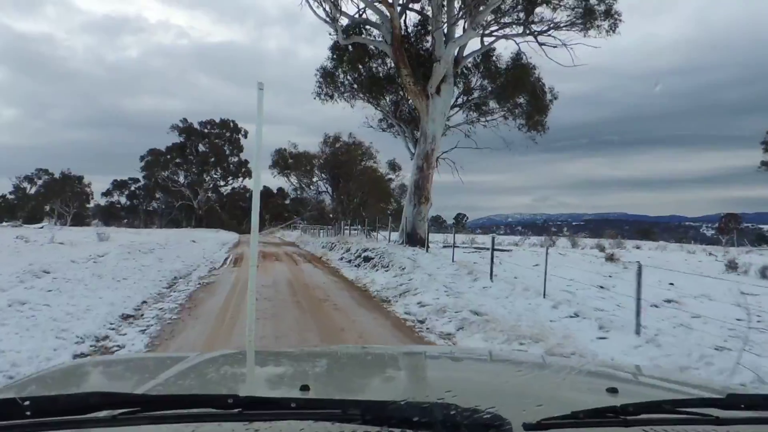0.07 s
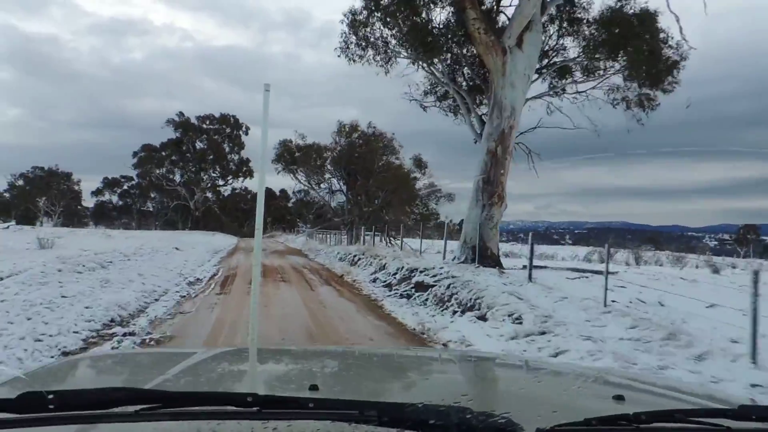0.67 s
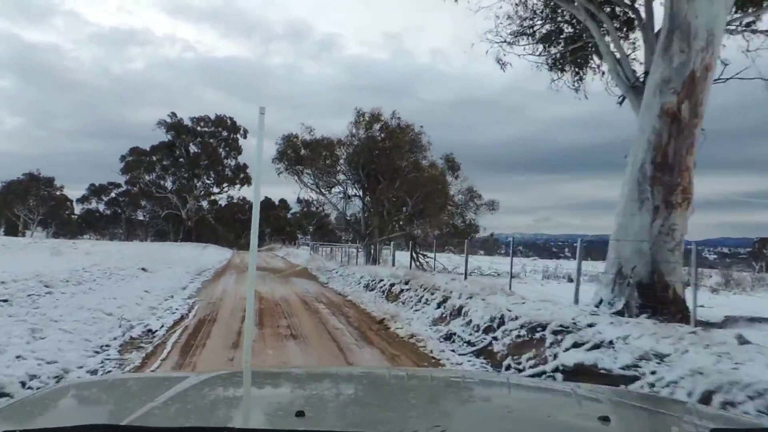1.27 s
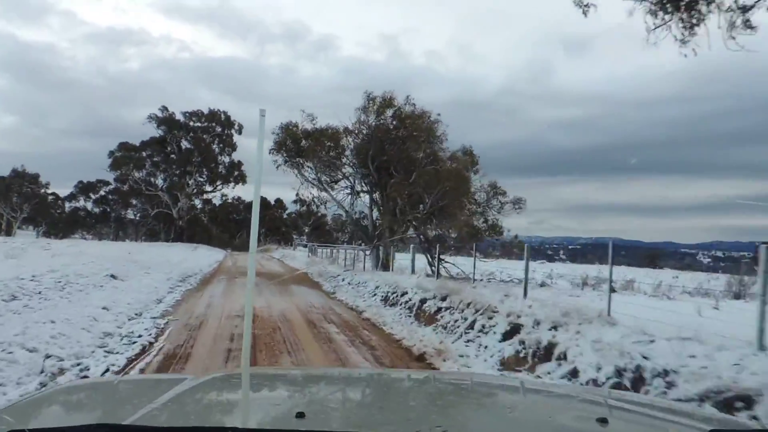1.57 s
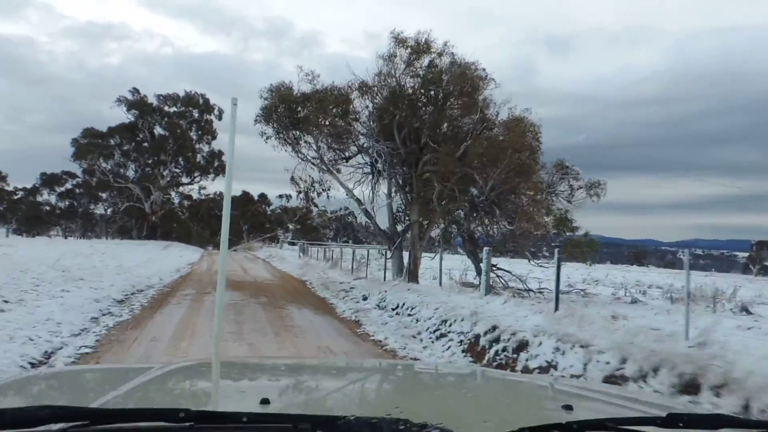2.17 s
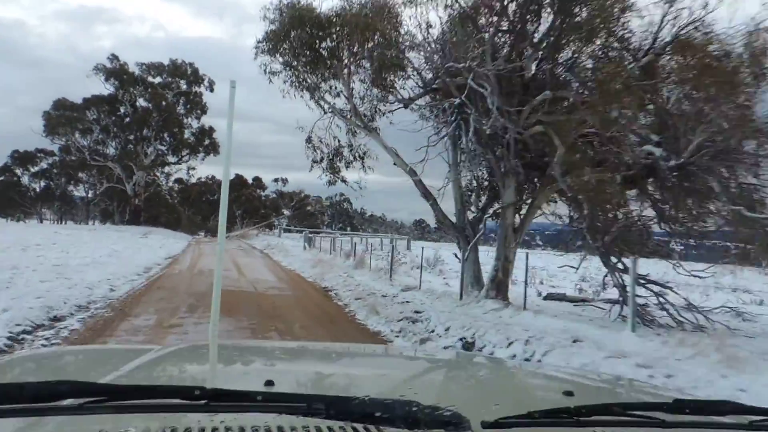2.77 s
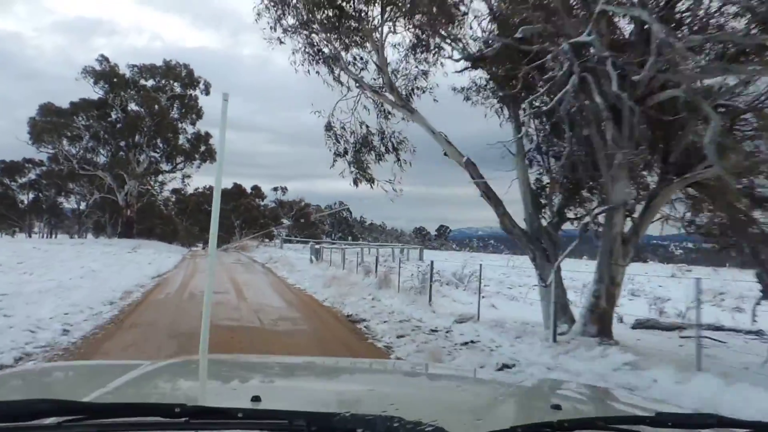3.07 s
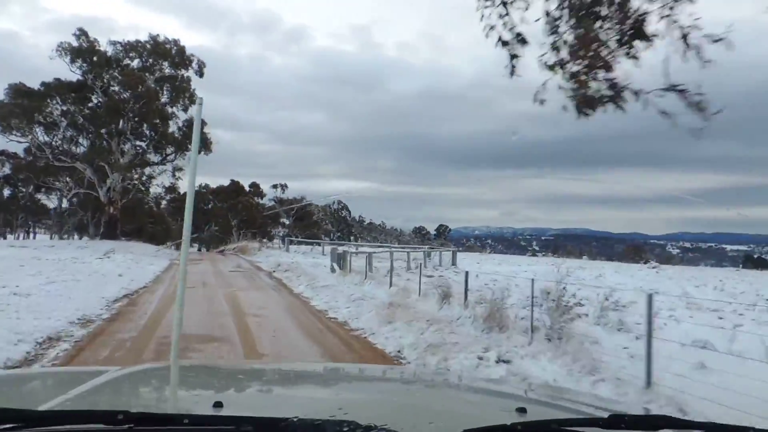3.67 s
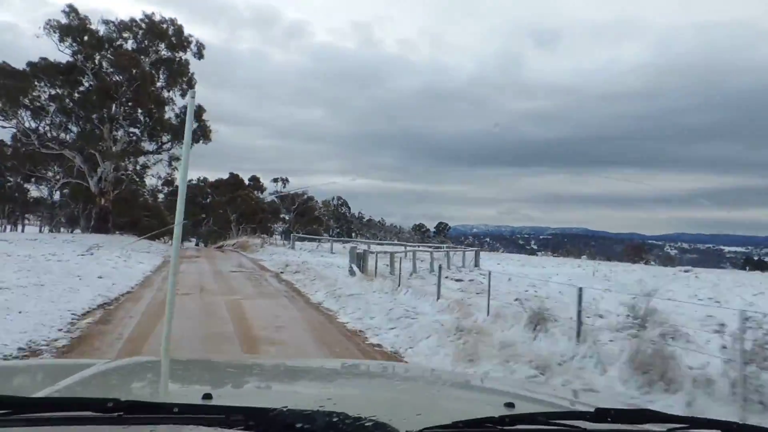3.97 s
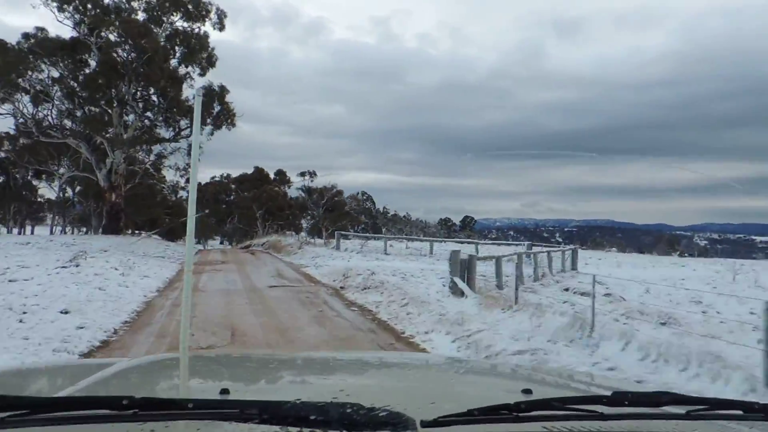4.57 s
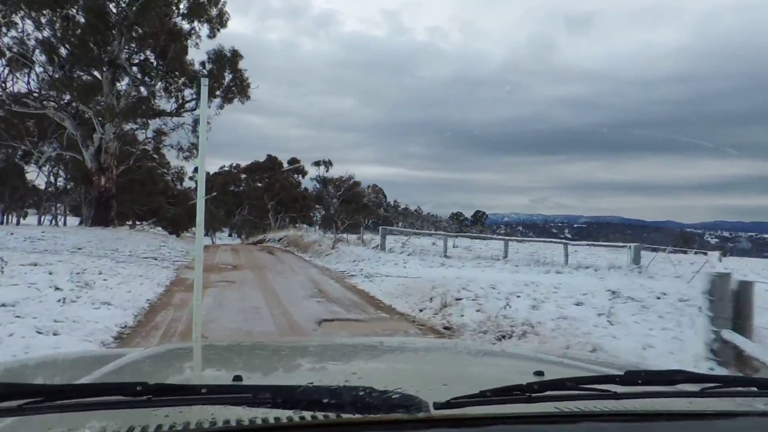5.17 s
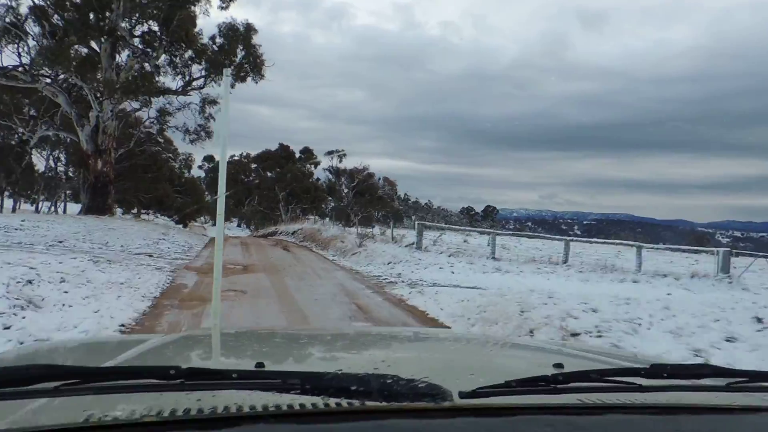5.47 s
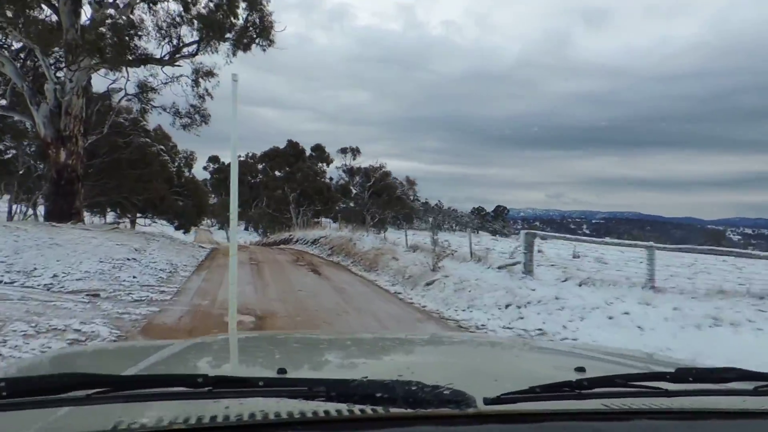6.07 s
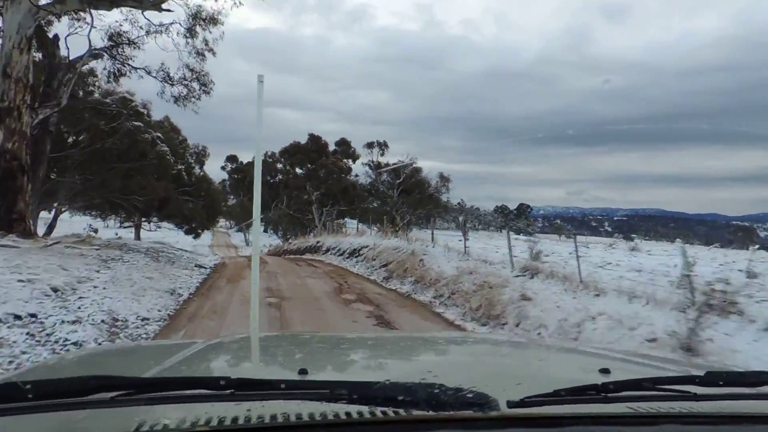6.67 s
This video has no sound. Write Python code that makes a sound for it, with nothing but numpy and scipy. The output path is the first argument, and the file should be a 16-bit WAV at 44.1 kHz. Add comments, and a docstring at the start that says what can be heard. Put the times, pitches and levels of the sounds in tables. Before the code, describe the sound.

Inside a vehicle on a slushy dirt road: low engine hum, booming bumps, hissing grit and scattered pebble knocks.

```python
"""A low engine drone and the boom of bumps fill a four-wheel drive slowly gathering speed on wet dirt.
Firing harmonics and road shocks excite the cab's air resonances, and the floor pan drums.
The tyres roar and throw grit and slush at the wheel arches, and puddles splash underneath.
Stones and pebbles rap the underside, loose metal parts chink, and a few sharp dry clicks stand out."""
import sys
import numpy as np
from scipy import signal
from scipy.fft import rfft, irfft, next_fast_len
from scipy.io import wavfile
from scipy.ndimage import uniform_filter1d, map_coordinates

SR = 44100
rng = np.random.default_rng(int(sys.argv[2]) if len(sys.argv) > 2 else 0)


def log_audio(samples):
    """Write samples as a 16-bit WAV file to the path given in sys.argv[1]."""
    # one column per channel
    frames = np.atleast_2d(samples).T
    # limit to full scale, then quantise
    limited = np.clip(frames, -1, 1)
    pcm = np.round(limited * 32767).astype(np.int16)
    wavfile.write(sys.argv[1], SR, pcm)


N = 305613

# coarseness of the road, heard as tyre roar: (time [s], level [dB])
ROAD_COARSENESS = [(0.13, -30.5), (0.49, -28.0), (0.88, -35.0), (1.42, -34), (1.75, -38.5), (2.35, -29.5),
                   (3.52, -29.5), (3.64, -25), (3.76, -36), (3.88, -35), (4.12, -43.5), (4.18, -43.5),
                   (4.69, -43.5), (4.84, -40), (5.47, -35), (5.98, -36.0), (6.73, -28.5), (6.85, -33.5)]
# transmission through the floor pan: (frequency [Hz], gain [dB])
FLOOR_TRANSMISSION = [(600, -3), (2000, 3), (5000, -8)]


def engine(overtone_db=-0.9, waver_db=1.0, jitter_rad=0.026):
    """Periodic firing gives a harmonic series; the second harmonic drones on a cabin resonance."""
    firing = [(0.07, 50.38), (1.2, 49.47), (2.5, 49.95), (3.5, 50.77), (4.5, 51.46), (5.5, 53.2),
              (6.93, 54.49)]  # (time [s], firing rate [Hz])
    fundamental = [(0.07, -22), (1.2, -21), (2, -18.5), (2.8, -21), (3.7, -16), (4.5, -18.5), (5.4, -17),
                   (6.1, -18.5), (6.93, -19)]  # (time [s], level [dB])
    drone = [(0.13, -26.0), (0.25, -22.5), (1.03, -25.0), (2.77, -23.0), (3.1, -20.0), (4.54, -27.5),
             (4.78, -24.5), (5.86, -21), (6.13, -23.5), (6.85, -20.5)]  # all overtones together: (time [s], level [dB])
    orders = [(2, 1, 1), (3, -28.5, -13.5), (4, -22.5, -11.5), (5, -21.5, -32.5), (6, -38, -24.5),
              (8, -32.5, -28)]  # (harmonic number, start level [dB], end level [dB])
    (hz,), (drone_db,), (hum_db,) = curves(firing), curves(drone), curves(fundamental)
    phase = 2 * np.pi * np.cumsum(hz) / SR + jitter_rad * wobble(17)
    hum = amp(hum_db + waver_db * wobble(5.6)) * np.sin(phase)
    overtones = np.zeros(N)
    for k, start_db, end_db in orders:
        gain = amp(np.linspace(start_db, end_db, N) + waver_db * wobble(7))
        overtones += gain * np.sin(k * phase + 2 * np.pi * rng.random())
    return np.sqrt(2) * (hum + amp(drone_db + overtone_db) * overtones)


def body(drum_db=1.25, flutter_db=1.0, lurch_db=1, usual_shake_db=-13.5):
    """Forced vibration: bumps drive the cab's low air resonance; road and ruts drum on the floor pan."""
    shake = [(0.13, -16.5), (0.19, -17.5), (0.61, -6.5), (0.73, -9.5), (0.88, -18.5), (1.12, -8),
             (2.05, -19), (2.32, -12.5), (2.65, -19), (3.07, -10.5), (3.13, -15.0), (3.82, -8.0),
             (4.21, -14), (5.14, -15), (5.44, -12), (5.77, -17), (5.98, -13), (6.85, -13)]  # shaking of the cab: (time [s], level [dB])
    ruts = [(0.41, 0.081, -28), (1.46, 0.031, -25), (3.2, 0.07, -25), (5.398, .06, -23.5),
            (6.557, 0.061, -26.5)]  # (peak time [s], half length [s], level [dB])
    # spectra of the cab's air and of the floor pan: (frequency [Hz], level [dB])
    boom_spectrum = [(8, -21.5), (17, -12), (28, -6), (34, -5.5), (39, 3), (44, -4), (52, -11), (62, -18.5),
                     (85, -19.5), (140, -41), (400, -100)]
    drum_spectrum = [(45, -32), (70, 2.5), (100, -3), (126, 5.5), (145, -2), (165, -1.5), (200, -2.5),
                     (240, -14), (400, -22), (1200, -73)]
    shake_db, = curves(shake)
    boom = cabin(noise(), boom_spectrum)
    running_power = uniform_filter1d(np.mean(boom ** 2, axis=0), size=SR // 9)
    boom /= np.sqrt(np.abs(running_power))  # the bumps alone set the slow swells
    rolling_db = on_road(coarse_db=-27.5, slope=0.49) + 0.24 * (shake_db - usual_shake_db)
    rolling = amp(rolling_db + flutter_db * wobble(12))
    jolts = sum(amp(db) * swell(s, half_s) for s, half_s, db in ruts)
    drum = np.hypot(rolling, jolts) * unit(cabin(noise(), drum_spectrum))
    return amp(shake_db + lurch_db * wobble(16)) * boom + amp(drum_db) * drum


def tyres(roar_db=0.5, grit_db=5.0, spray_db=1, hiss_db=-2, clump_db=1.2, surge_db=1.27):
    """Random excitation: the tread roars on rough dirt; sand and slush patter on the wheel arches."""
    # spectra of tread, sand and slush: (frequency [Hz], level [dB])
    roar_spectrum = [(100, -9.5), (200, -6), (270, 0), (385, 0.5), (480, -6.5), (570, -7), (670, -5.5),
                     (850, -11), (1100, -16.5), (1600, -22.5), (2500, -27), (5000, -34), (15000, -47)]
    grit_spectrum = [(300, -33), (900, 1.5), (1400, 6), (1800, 4), (2100, 2), (2700, -0.5), (3500, -6.5),
                     (5500, -7), (8000, -5.5), (14000, -15)]
    spray_spectrum = [(1500, -21), (4000, -4), (6500, -1.5), (8300, -2), (9000, -2), (9900, 1), (11000, 1),
                      (12200, 1.5), (13200, -3), (14500, -6.5)]
    tread_db, = curves(ROAD_COARSENESS)
    grit_gain, slush_gain = thrown()
    roar = unit(cabin(patchy(noise(), depth_db=0.05), roar_spectrum)) * amp(0.89 * wobble(30))
    sand = grains(per_second=450, scatter_db=4.0, t60=0.02) + amp(hiss_db) * noise()
    drops = grains(per_second=550, scatter_db=-1, t60=0.016) + noise()
    grit = grit_gain * amp(grit_db) * unit(cabin(patchy(sand, depth_db=2), grit_spectrum))
    spray = slush_gain * amp(spray_db) * unit(cabin(patchy(drops, depth_db=2), spray_spectrum))
    clods = amp(clump_db * wobble(45) + surge_db * wobble(10))  # mud leaves the tread in clumps
    return amp(tread_db + roar_db) * roar + clods * (grit + spray)


def stones(rap_db=-7, thud_db=-8, tock_db=-10, splat_db=-6, scrape_db=-3, t60=0.064, attack_s=0.00033):
    """Impact excitation: stones chatter on a damped panel; heavy ones also knock, wet ones sizzle."""
    # (time [s], level [dB], relative knock [dB], knock pitch [Hz], relative sizzle [dB])
    strikes = [(0.27, -33.5, 4, 910, -0.5), (0.4564, -21.5, 9, 1000, -9), (0.5602, -25.5, 5, 990, -9),
               (0.6744, -30, -6, 1140, -6), (1.039, -34, 9, 1035, -14), (1.4731, -30, -5, 940, -7),
               (1.7176, -30, 0, 1800, -22), (2.3816, -35, 8, 910, -2), (2.7756, -34, 0, 992, -5),
               (2.855, -32.5, 13.5, 1294, -8), (2.9514, -32, 11, 1230, -14), (3.284, -29.5, 10, 920, -11),
               (3.4946, -24, 5.5, 970, -14), (3.6463, -20.5, 0, 1020, -19), (3.6645, -20.5, 11, 1533, -16),
               (3.679, -28, 0, 1310, -5), (3.922, -24.5, 1, 900, -16), (4.0337, -34, -16, 1240, -20),
               (4.158, -32.5, -17, 921, -25), (4.9312, -38.5, -6, 910, -3.5), (5.249, -35, -2, 930, -3),
               (5.3249, -38, -2, 1060, 1), (5.3945, -27, -2, 910, -8), (5.628, -27.5, -1, 1770, -28),
               (5.7862, -31, -6, 980, -14), (6.0225, -36, 16.5, 927, -14), (6.5216, -28.5, 6, 1020, -4),
               (6.6801, -27, 6, 1000, -19), (6.7247, -19.5, 3, 910, -5), (6.77, -27, 2, 1011, -12),
               (6.821, -30.5, 6, 990, 0)]
    # spectra of rap, knock and wet sizzle: (frequency [Hz], level [dB])
    panel_spectrum = [(500, -12), (1500, -8), (1900, 9), (2500, 6), (4000, 2.5), (5500, 3.5), (7500, -1.5),
                      (14000, -18)]
    knock_spectrum = [(150, -18), (400, 0), (850, 1), (1400, -2), (1900, -5), (2800, -14), (6000, -40)]
    sizzle_spectrum = [(4000, -21), (8000, 10.5), (10500, 9), (12300, 11.5), (15000, -7)]
    t = np.arange(SR // 5) / SR
    envelope = amp(-60 * t / t60) * (1 - np.exp(-t / attack_s))
    blows, tocks = np.zeros((3, N)), np.zeros((2, N))
    for s, db, knock_db, hz, sizzle_db in strikes:
        add(blows, s, amp([[db], [db + knock_db], [db + sizzle_db]]) * envelope)
        add(tocks, s, amp(db + knock_db + tock_db) * tock(hz, t60=0.046))
    raps, knocks, sizzles = blows
    chatter = unit(grains(per_second=1100, scatter_db=4.5, t60=.004) + amp(scrape_db) * noise())
    rap = cabin(raps * patchy(chatter, depth_db=3), panel_spectrum)  # each spot rings differently
    thud = cabin(knocks * noise(), knock_spectrum)
    splat = cabin(sizzles * noise(), sizzle_spectrum)
    ring = cabin(tocks, FLOOR_TRANSMISSION)
    return ring + amp(rap_db) * rap + amp(thud_db) * thud + amp(splat_db) * splat


def pebbles(level_db=-1, size_range_db=10, count=170, centre_hz=1450):
    """Small random impacts excite the modes of the underside, harder when more grit flies."""
    grit_gain, _ = thrown()
    taps = np.zeros((2, N))
    for when, pitch, size in rng.random((count, 3)):
        at = int(when * N)
        hz = centre_hz * 2 ** (2 * pitch - 1)  # an octave either way
        add(taps, at / SR, grit_gain[at] * amp(level_db + size_range_db * size) * tock(hz, t60=.047))
    return cabin(taps, FLOOR_TRANSMISSION)


def clicks(level_db=5):
    """Sharp dry clicks, each an impulse with a bass-heavy, step-like spectrum."""
    snaps = [(3.7715, -19), (4.0277, -16), (5.3868, -7)]  # (time [s], level [dB])
    click_spectrum = [(60, 12), (300, -4), (700, 11), (1500, 5.5), (4000, -5), (9000, -10), (15000, -10)]  # (frequency [Hz], level [dB])
    impulses = np.zeros(N)
    for s, db in snaps:
        add(impulses, s, amp([db + level_db]))
    return filtered(impulses, lambda hz: amp(along(click_spectrum, hz)))


def chinks(t60=0.057, attack_s=0.00083, phase_step_rad=0.12):
    """Loose metal parts ring on one high damped mode; a random walk in phase broadens its line."""
    contacts = [(0.563, 9950, -23.5), (1.04, 8260, -41), (1.487, 12060, -30), (1.655, 12150, -43),
                (1.667, 9750, -31.5), (2.776, 12100, -30), (3.915, 12100, -43), (5.322, 11100, -37),
                (6.822, 10500, -30)]  # (time [s], frequency [Hz], level [dB])
    t = np.arange(SR // 6) / SR
    envelope = amp(-60 * t / t60) * (1 - np.exp(-t / attack_s))
    rings = np.zeros((2, N))
    for s, hz, db in contacts:
        drift = phase_step_rad * np.cumsum(rng.standard_normal((2, len(t))), axis=1)
        add(rings, s, amp(db) * envelope * np.sin(2 * np.pi * hz * t + drift))
    return rings


def puddles():
    """Dense drop impacts merge into shot noise as a sheet of water sweeps the underside."""
    crossings = [(1.424, 0.068, -41.5), (1.542, 0.07, -46), (6.16, 0.08, -57)]  # (peak time [s], half length [s], level [dB])
    splash_spectrum = [(1000, -18), (3000, -6.5), (5600, -2), (7000, -9), (8300, 3), (9100, -3),
                       (10000, -0.5), (11500, -5), (14000, -25)]  # (frequency [Hz], level [dB])
    sheet = sum(amp(db) * swell(s, half_s) for s, half_s, db in crossings)
    drops = grains(per_second=2200, scatter_db=3, t60=0.0084)
    return sheet * unit(cabin(patchy(drops, depth_db=1.5), splash_spectrum))


def tock(hz, t60):
    """A struck spot on the underside rings as a sum of damped modes, different at each ear."""
    modes = [(.62, 3), (.87, 1), (1, -5), (1.16, -12), (1.43, -10), (1.9, -10)]  # (frequency ratio, level [dB])
    t = np.arange(SR // 12) / SR
    ring = np.zeros((2, len(t)))
    for ratio, db in modes:
        gain = amp(db + 2 * rng.standard_normal((2, 1)))
        ring += gain * np.sin(2 * np.pi * (hz * ratio * t + rng.random((2, 1))))
    return ring * amp(-60 * t / t60) * (1 - np.exp(-2000 * t))


def thrown():
    """Gains of flying grit and slush: the incoherent shares of road and mud add in power."""
    mud = [(0.418, .14, -44.5, -44), (0.64, .06, -45, -48.5), (1.465, .07, -47, -50),
           (2.874, 0.24, -54, -46), (3.676, 0.045, -45, -41), (3.885, 0.047, -47.5, -50),
           (5.316, 0.066, -52, -53), (5.69, 0.14, -54, -42), (6.062, 0.083, -57, -51),
           (6.744, 0.29, -45.5, -48)]  # soft patches: (peak time [s], half length [s], grit [dB], slush [dB])
    grit_power = amp(on_road(coarse_db=-49.5, slope=1.14)) ** 2
    slush_power = amp(on_road(coarse_db=-49.5, slope=0.89)) ** 2
    for s, half_s, grit_db, slush_db in mud:
        crossing = swell(s, half_s)
        grit_power += (amp(grit_db) * crossing) ** 2
        slush_power += (amp(slush_db) * crossing) ** 2
    return np.sqrt(grit_power), np.sqrt(slush_power)


def on_road(coarse_db, slope, coarse_road_db=-30):
    """Power law: a level of coarse_db on a coarse stretch, gaining slope dB per dB of tyre roar."""
    road_db, = curves(ROAD_COARSENESS)
    return coarse_db + slope * (road_db - coarse_road_db)


def cabin(pair, spectrum):
    """Interaural coherence: two signals are coloured and blended so long waves reach both ears alike."""
    coherence = [(60, 0.98), (130, .99), (260, 0.97), (560, 0.93), (1000, 0.81), (2000, 0.018), (12000, 0)]  # (frequency [Hz], left-right correlation [0..1])
    def blend(hz):
        turn = np.arccos(np.clip(along(coherence, hz), -1, 1)) / 2
        return amp(along(spectrum, hz)) * [np.cos(turn), np.sin(turn)]
    mid, side = filtered(pair, blend)
    return np.array([mid + side, mid - side])


def grains(per_second, scatter_db, t60):
    """Shot noise: many tiny impacts of random size, each a decaying burst; rms 1."""
    hits = (rng.random(N) < per_second / SR) * amp(scatter_db * np.clip(rng.standard_normal(N), -2, 2))
    decay = amp(-60 / (t60 * SR)) ** 2
    energy = signal.lfilter([1], [1, -decay], hits ** 2)
    return unit(np.sqrt(energy) * noise())


def patchy(pair, depth_db):
    """Random modulation lets patches of frequency and time swell and fade."""
    spectra = signal.stft(pair, nperseg=512)[2]
    field = uniform_filter1d(rng.standard_normal(spectra.shape[1:]), size=8, axis=0)
    field = uniform_filter1d(field, size=7, axis=1)
    return signal.istft(spectra * amp(depth_db * unit(field)), nperseg=512)[1][:, :N]


def swell(s, half_s):
    """A Gaussian rise and fall as the wheels cross something at time s."""
    return np.exp(-((np.arange(N) / SR - s) / half_s) ** 2)


def wobble(rate):
    """A smooth random curve, rate knots a second; rms 1."""
    knots = rng.standard_normal(int(N * rate / SR) + 4)
    return unit(map_coordinates(knots, [np.arange(N) * rate / SR]))


def noise():
    """Two uncorrelated white noises."""
    return rng.standard_normal((2, N))


def filtered(x, response):
    """Multiplies the spectrum of x by a frequency response."""
    size = next_fast_len(N + SR // 4)
    return irfft(rfft(x, size) * response(np.fft.rfftfreq(size, 1 / SR)), size)[..., :N]


def along(points, hz):
    """Interpolates (frequency [Hz], value) points on a log axis."""
    freqs, values = np.transpose(points)
    return np.interp(np.log(hz + 1), np.log(freqs + 1), values)


def curves(rows):
    """One value per sample for each column after the time."""
    times, *columns = np.transpose(rows)
    return [np.interp(np.arange(N) / SR, times, column) for column in columns]


def add(track, s, sound):
    """Superposes a sound on the track at time s."""
    part = track[..., round(s * SR):][..., :sound.shape[-1]]
    part += sound[..., :part.shape[-1]]


def amp(db):
    """Decibels to gain."""
    return 10 ** (np.asarray(db) / 20)


def unit(x):
    """Scales to rms 1."""
    return x / np.sqrt(np.mean(x ** 2) + 1e-20)


def scene():
    """Level differences between the ears set drone and boom slightly left, road noise slightly right."""
    low = (engine() + body()) * amp([[.3], [-.3]])
    road = (tyres() + puddles() + pebbles() + stones() + clicks() + chinks()) * amp([[-.6], [.6]])
    return low + road


def record(dry):
    """Soft saturation rounds the peaks; the sound starts after a moment and is steeply low-passed."""
    start_s, cutoff_hz = 0.069, 14400
    rounded = dry / (1 + np.abs(dry) ** 8) ** (1 / 8)
    fade_in = np.clip((np.arange(N) / SR - start_s) / .002, 0, 1)
    return filtered(rounded * fade_in, lambda hz: 1 / (1 + (hz / cutoff_hz) ** 120))


dry = scene()
out = record(dry)
log_audio(out)
```